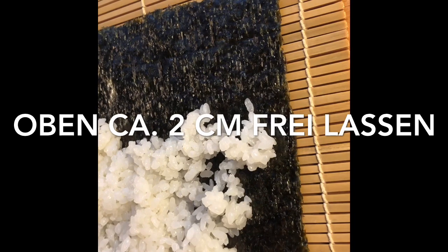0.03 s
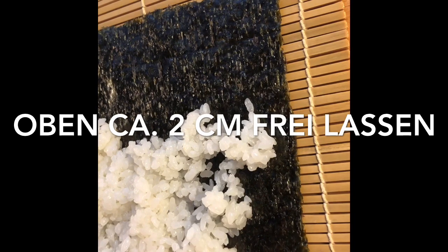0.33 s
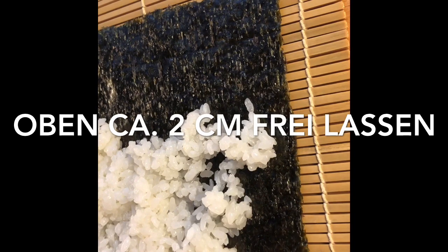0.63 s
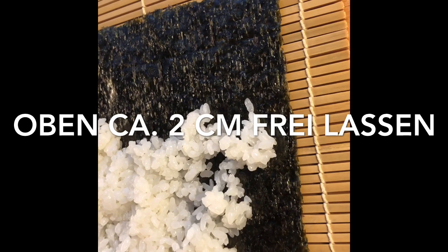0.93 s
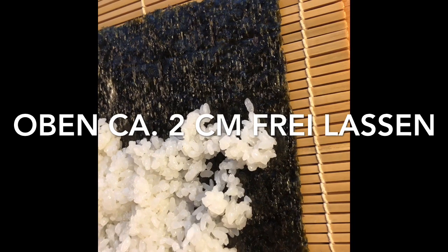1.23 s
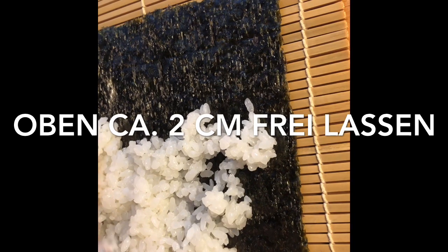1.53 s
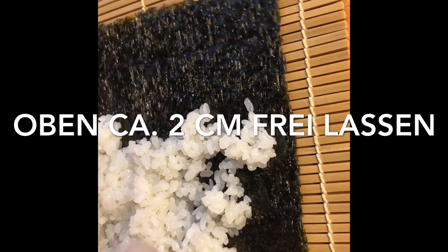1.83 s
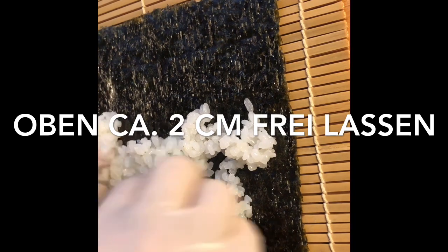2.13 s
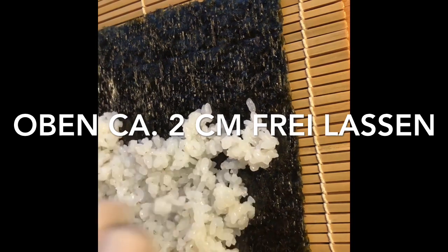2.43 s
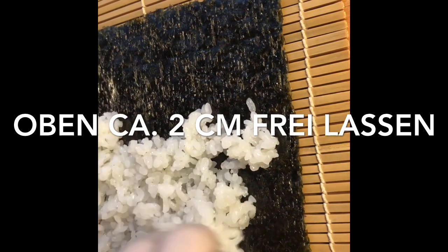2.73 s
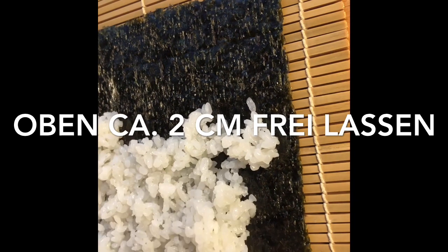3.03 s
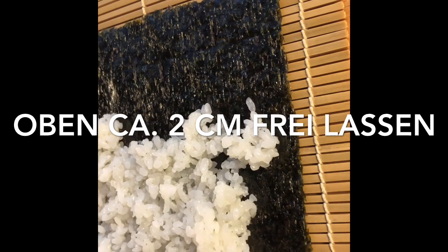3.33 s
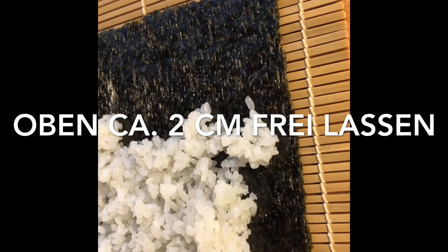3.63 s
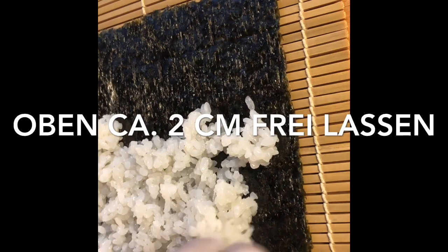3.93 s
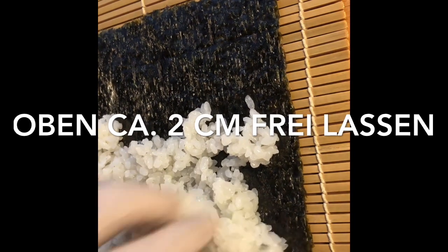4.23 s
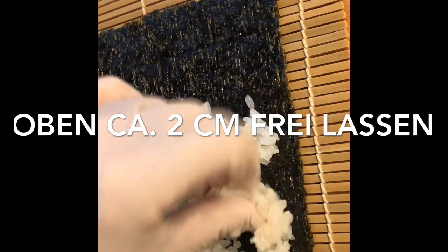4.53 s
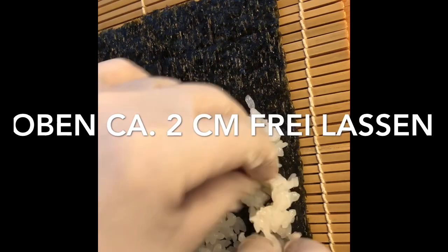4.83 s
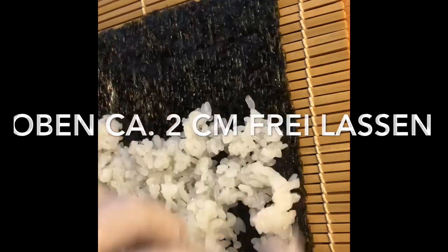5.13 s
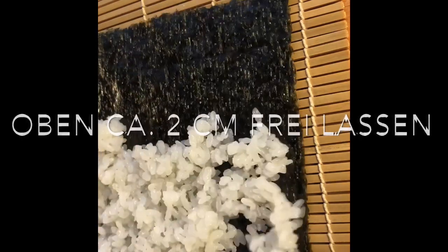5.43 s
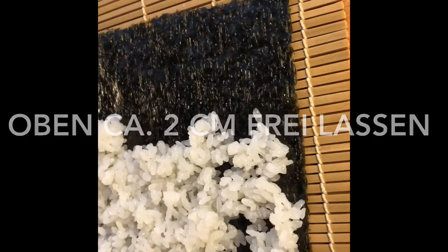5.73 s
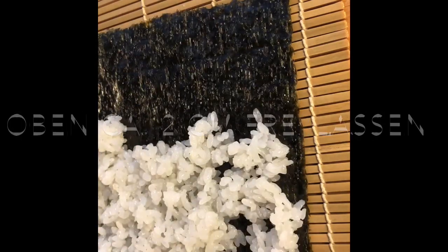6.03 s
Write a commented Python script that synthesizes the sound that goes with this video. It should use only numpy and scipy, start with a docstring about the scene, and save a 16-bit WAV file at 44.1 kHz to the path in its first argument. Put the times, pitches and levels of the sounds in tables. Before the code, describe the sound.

Close up in a quiet kitchen, brittle seaweed gives small, crisp, uneven snaps while fingers push sticky rice across it. The wet grains crackle faintly with each push, over soft rubbing and a few low worktop bumps. The snaps start sparse and light, grow louder and busier around the middle, and keep coming in little clusters to the end.

```python
"""A brittle seaweed sheet snaps as a hand presses and spreads sticky rice over it on a bamboo mat, close up.
Each snap is a thread letting go and a small patch ringing. Grains peel off in quick runs that make the
sheet flap, and wet rice crackles finely under the fingers. Skin brushes past twice, the palm rubs softly,
a few dull bumps come through the worktop, and a small quiet kitchen answers."""
import sys
import numpy as np
from scipy import signal
from scipy.fft import rfft, irfft, next_fast_len
from scipy.io import wavfile

SR = 44100
rng = np.random.default_rng(int(sys.argv[2]) if len(sys.argv) > 2 else 0)


def unload_audio(sound):
    """Save the sound as a 16-bit wav file, at the path given as the first command line argument."""
    columns = np.transpose(np.atleast_2d(sound))
    # keep every value between -1 and 1, then stretch to whole-number steps
    steps = np.round(np.clip(columns, -1, 1) * 32767)
    wavfile.write(sys.argv[1], SR, steps.astype(np.int16))


N = 272097
TIME = np.arange(N) / SR

# Clear snaps of the sheet and of parting grains. Each row: time in seconds, energy in dB (as a 1 ms burst),
# ring in Hz, width in octaves.
SNAPS = [(0.112, -40, 4560, 0.67), (0.1914, -45.5, 4480, 1), (0.2372, -45, 6800, 0.45),
         (0.4221, -46.5, 7860, 2.3), (0.4774, -46, 6260, 2.2), (0.549, -45, 2400, 2.8),
         (0.695, -42, 4840, 0.9), (0.7827, -30.5, 3630, 0.57), (0.834, -44, 4750, 1),
         (0.8673, -30, 8200, 0.88), (0.8773, -43.5, 8200, 0.8), (1.181, -37, 8400, 1.4),
         (1.2102, -28, 6100, 1.2), (1.6028, -35.5, 5300, 0.97), (1.6113, -33, 5100, 0.7),
         (1.658, -33.5, 7260, 2.6), (1.755, -39, 3570, 0.91), (1.7785, -46, 5400, 0.83),
         (1.8468, -30, 4200, 0.6), (1.8705, -28, 4860, 1.1), (2.0005, -38, 5400, 0.86),
         (2.044, -28.5, 8700, 2.4), (2.1125, -45, 8600, 1), (2.141, -38, 7060, 1.6),
         (2.182, -25, 5000, 0.8), (2.191, -29, 4400, 2.2), (2.2373, -38, 4700, 0.62),
         (2.26, -36, 4200, 0.73), (2.2903, -33, 3900, 1.3), (2.317, -36, 5200, 1.3),
         (2.3276, -27, 3300, 3.6), (2.3649, -38.5, 8200, 0.77), (2.5324, -33, 4280, 1.9),
         (2.624, -36.5, 9100, 1.3), (2.6381, -38, 6100, 1.9), (2.7427, -23.5, 7240, 5.5),
         (2.743, -27.5, 10300, 0.2), (2.8211, -22.5, 4480, 2.2), (2.958, -36, 4600, 1.6),
         (3.1266, -39, 5500, 0.98), (3.1782, -36, 7400, 1.9), (3.2195, -31, 3750, 1.5),
         (3.244, -17, 3150, 0.98), (3.2535, -36, 2950, 0.3), (3.344, -36, 7900, 1.7),
         (3.3734, -18, 5500, 0.6), (3.3738, -21.5, 10500, 2.2), (3.3737, -32, 1210, 0.34),
         (3.3804, -33.5, 8200, 1.3), (3.418, -20, 3180, 2.4), (3.4424, -27, 4800, 1.4),
         (3.4457, -19, 4770, 0.44), (3.4456, -17, 2800, 0.25), (3.4464, -13, 3800, 0.18),
         (3.4479, -11.5, 4850, 0.12), (3.4494, -23, 3200, 1.3), (3.4903, -27.5, 5600, 0.57),
         (3.5775, -28.5, 4560, 1), (3.604, -27.5, 1244, 0.23), (3.6047, -24, 3860, 2.8),
         (3.6511, -36.5, 7400, 2.6), (3.724, -24.5, 4540, 0.62), (3.8735, -32, 5300, 1.2),
         (3.8943, -18, 7100, 1.6), (4.0118, -36.5, 7100, 2.1), (4.0361, -43, 7300, 2.6),
         (4.0564, -32, 5000, 1.4), (4.106, -27, 4840, 3.4), (4.1851, -35, 6300, 2), (4.196, -38, 5200, 3.9),
         (4.3225, -33.5, 5470, 0.64), (4.3392, -34.5, 9260, 0.7), (4.3963, -33.5, 5370, 2.1),
         (4.4356, -33, 5000, 1.4), (4.4471, -28.5, 6000, 1.8), (4.448, -18, 4440, 0.71),
         (4.5065, -32, 2420, 3.4), (4.5153, -41, 7400, 2.2), (4.5849, -39.5, 6200, 3.2),
         (4.6573, -43, 7400, 1.5), (4.673, -42, 5600, 0.92), (4.7388, -38, 9600, 0.61),
         (4.789, -35, 12500, 1.4), (4.7893, -29, 2880, 0.71), (4.8108, -35.5, 9400, 1.9),
         (4.8277, -33.5, 3460, 1.4), (4.8629, -38, 6500, 3.2), (4.8924, -33, 2420, 1),
         (4.917, -24.5, 1420, 1.04), (4.9245, -28.5, 1810, 2.8), (4.929, -31, 7000, 2.8),
         (4.984, -31.5, 2430, 1), (5.051, -25, 4800, 4), (5.054, -28, 4300, 1.7), (5.0639, -14, 5830, 0.88),
         (5.065, -10, 9000, 2.5), (5.2055, -39.5, 1820, 0.37), (5.394, -24, 3860, 5.6),
         (5.491, -21.5, 4900, 0.66), (5.5615, -28, 3620, 0.65), (5.5712, -37.5, 6200, 2.9),
         (5.5804, -37, 4800, 0.9), (5.592, -20.5, 3800, 0.77), (5.593, -30, 11500, 1),
         (5.6682, -23.5, 4540, 1.9), (5.6741, -22, 4580, 0.35), (5.7364, -39, 4800, 2.9),
         (5.8611, -37.5, 5500, 1.5), (5.8829, -26, 4740, 0.64), (5.9111, -31, 4800, 0.78),
         (5.9344, -28, 9350, 2.1), (5.9395, -19, 6430, 1.5), (5.9694, -32.5, 7800, 2.4),
         (6.0667, -32, 9900, 0.89), (6.1363, -41.5, 12200, 0.8)]
# Runs of tiny snaps as sticky rice lets go. Each row: centre and spread in seconds, energy in dB,
# ring in Hz, flap against the run in dB, thud in Hz.
PEELS = [(0.827, 0.0044, -30, 4570, -5, 190), (1.178, 0.0089, -28.5, 7460, -10, 170),
         (1.4386, 0.0038, -26, 7300, -10.5, 140), (1.569, 0.0033, -32.5, 6400, -26, 190),
         (1.658, 0.0061, -37, 7800, -20, 190), (1.857, 0.009, -30.5, 4600, -8, 180),
         (2.287, 0.004, -31.5, 4220, 0, 160), (2.329, 0.0048, -33.5, 6400, -3, 75),
         (2.818, 0.0035, -30, 4630, -13, 170), (2.877, 0.0018, -29.5, 7140, -14, 180),
         (2.946, 0.0067, -17.5, 4700, -12, 73.5), (3.4482, 0.0024, -14, 6830, -7, 134),
         (3.725, 0.0036, -21, 4450, -11, 141), (4.109, 0.0028, -17, 3870, -14.5, 63.6),
         (4.855, 0.012, -37, 8000, -16, 190), (5.057, 0.0015, -15.5, 6130, -5.5, 68.4),
         (5.392, 0.0097, -28, 6400, -3.5, 150), (5.672, 0.0047, -20, 4550, -11.5, 68.6),
         (5.885, 0.0048, -28, 4360, -10, 159)]
# The sheet's ring on the mat. Each row: pitch in Hz, width in Hz, relative level in dB.
SHEET_MODES = [(1120, 290, 10), (1920, 47, -2), (2674, 210, -0.5), (3620, 290, 1)]
# Finger pushes into the rice. Each row: start and length in seconds, relative crackle level in dB,
# offset in dB at full fineness.
PRESSES = [(0.0, 0.053, -61.5, -12), (0.684, 0.28, -60, -2), (1.008, 0.48, -63, -6), (1.608, 0.2, -54, -9),
           (1.93, 0.21, -55.5, -2.5), (2.159, 0.087, -47.5, -8.5), (2.45, 0.21, -57, -1.5),
           (2.733, 0.12, -52.5, -5.5), (3.133, 0.36, -52.5, -3.5), (3.45, 0.13, -49, -19),
           (3.692, 0.039, -53.5, -8), (3.942, 0.17, -52.5, -4), (4.307, 0.21, -59, -5),
           (4.64, 0.42, -60, 0.5), (5.507, 0.13, -54, -4), (5.856, 0.16, -53.5, -6), (6.125, .1, -57.5, -3)]
# Fingers brushing the sheet. Each row: centre and spread in seconds, level in dB.
BRUSHES = [(3.1, 0.015, -39.5), (5.299, 0.023, -31.5)]
# Fader curve of the rubbing palm. Each row: time in seconds, relative level in dB.
RUB_LEVELS = [(0.0, -58.5), (0.38, -62.5), (1.72, -57.5), (1.82, -52), (2.23, -59), (3.28, -55.5),
              (3.61, -55.5), (3.81, -54.5), (5.76, -53.5), (6.17, -57.5)]
# Dull worktop bumps. Each row: start, rise and fade in seconds, relative level in dB, rumble centre in Hz.
BUMPS = [(0.01, 0.041, 0.16, -53.5, 226.4), (.13, 0.063, 0.077, -46, 164.4), (.86, 0.037, 0.11, -52.5, 282),
         (1.355, 0.025, 0.078, -45, 121.3), (2.537, 0.007, 0.013, -36.5, 215),
         (2.561, 0.013, 0.026, -34.5, 150), (2.6, 0.0083, 0.076, -40, 163), (2.66, 0.019, 0.16, -47.5, 57),
         (3.455, 0.019, 0.12, -46.5, 138.7)]
# Low resonances of worktop and kitchen. Each row: pitch in Hz, width in Hz, gain in dB.
BOOM_MODES = [(52, 4.2, 3.5), (138.5, 31, -2.5), (231, 29, -5.5), (304, 23, -5.5), (437, 33, -9)]
# EQ curves for rice, skin, palm, room tone and reverb tail. Each row: frequency in Hz, gain in dB.
CRACKLE_EQ = [(800, 4.5), (1700, -9.5), (2700, -6), (4500, 0.5), (7000, -0.5), (10000, 2), (16000, -2)]
BRUSH_EQ = [(290, -47), (500, -22), (1030, -6), (1130, -8), (1690, -11), (1790, -10), (3920, 0),
            (5240, -3.5), (6060, -1.5), (16000, -13)]
RUB_EQ = [(150, -29), (400, 1.5), (1000, 1), (2000, -0.5), (4000, -9), (12000, -12)]
KITCHEN_EQ = [(20, -22), (36, -7), (52, -4.5), (80, 1.5), (130, -3.5), (240, -3), (420, -5.5), (700, -12.5),
              (2000, -22), (6000, -26), (16000, -29)]
TAIL_EQ = [(60, 4.5), (150, 9.5), (400, 6), (2000, 1), (2850, 2.5), (4000, -0.5), (7000, -0.5), (11000, -4),
           (16000, -8)]


def snap(hz, octaves, lead_in_s=0.00035, rattle_s=0.0024, crack_db=-31):
    """A thread lets go; a small patch rings for a few cycles and nearby flakes rattle."""
    t = TIME[:800] - TIME[100]
    lead_in = 0.072 * np.exp(-np.abs(t) / lead_in_s)  # a very short swell of noise softens the attack
    rattle = 0.074 * np.exp(-np.abs(t) / rattle_s)
    push = rng.standard_normal(len(t)) * np.where(t < 0, lead_in, rattle)
    push[100] += 1  # the break itself
    width_hz = 2 * hz * np.sinh(octaves * np.log(2) / 2)
    # three resonances in series: the note takes a cycle or two to swell and has steep flanks
    note = ring(ring(ring(push, hz, 0.69 * width_hz), hz, 5.1 * width_hz), hz, 7.0 * width_hz)
    # the patch is too small to radiate much below its own note
    note = highpass(note, 0.31 * hz / 2 ** (octaves / 2))
    crack = highpass(ring(push, hz, 3.8 * hz), 0.71 * hz)
    return energy(note, 0) + energy(crack, crack_db)


def clear_snaps():
    """The foreground ticks of brittle sheet and parting grains, each breaking on its cue."""
    out = np.zeros(N)
    for s, db, hz, octaves in SNAPS:
        add(out, s - TIME[100], energy(snap(hz, octaves), db))
    return out


def faint_snaps(count=160, centre_hz=7000, over_db=4, scatter_db=3):
    """Lesser grains let go at random, as strongly as the fingers push."""
    out, push = np.zeros(N), finger_pressure()
    for slot, (when, size, pitch) in enumerate(rng.random((count, 3))):
        i = int((slot + when) / count * (N - 1))
        tick = snap(centre_hz * 2 ** (0.99 * (2 * pitch - 1)), octaves=0.79)
        add(out, TIME[i], push[i] * energy(tick, over_db + scatter_db * (2 * size - 1)))
    return out


def peels(thud_db=-16):
    """Sticky threads break in a run that swells and dies, and the freed sheet flaps back onto the mat."""
    out, t = np.zeros(N), TIME[:6000] - TIME[3000]
    for s, spread, db, hz, flap_db, thud_hz in PEELS:
        run = grains(len(t), rate=6000, scatter_db=2.5) * np.exp(-np.abs(t) / spread)
        run = highpass(ring(run, hz, 0.85 * hz), 0.1 * hz)
        # the run shakes the whole sheet, most of all the modes near its own pitch
        sheet = sum(energy(ring(run, mode_hz, width), mode_db - 7 * abs(np.log2(mode_hz / hz)))
                    for mode_hz, width, mode_db in SHEET_MODES)
        add(out, s + t[0], energy(energy(run, 7) + sheet, db))
        add(out, s + spread / 2, energy(sheet_flap(), db + flap_db))
        add(out, s, energy(mat_thud(thud_hz), db + thud_db))
    return out


def sheet_flap(drop_hz=1100, floor_hz=45, fall_s=0.00301, fade_s=0.0062, roughness=1.48):
    """Bending waves cross the limp sheet: the high ones arrive first, so the plop falls in pitch."""
    t = TIME[:6000]
    hz = floor_hz + drop_hz / (1 + t / fall_s)
    sweep = np.sin(2 * np.pi * np.cumsum(hz) / SR)
    crumple = eq(rng.standard_normal(len(t)), [(40, 0), (150, -1), (400, -1.5), (900, -4.5), (2500, -16.5)])
    return (sweep + roughness * level(crumple, 0)) * np.exp(-t / fade_s)


def mat_thud(hz, rise_s=0.0086, fade_s=0.013):
    """The mat settles with a late, low thud."""
    t = TIME[:9000]
    push = rng.standard_normal(len(t)) * (1 - np.exp(-t / rise_s)) * np.exp(-t / fade_s)
    return highpass(ring(push, hz, 0.5 * hz), hz)


def rice_crackle(cluster_db=2.5, patchy_db=2.5):
    """Wet grains of many sizes part under the fingers, in loose clusters; each size has its own pitch."""
    out, cluster = 0, cluster_db * drift(32)
    coarse, fine = finger_pressure(), finger_pressure(fineness=0.68)
    for hz in np.geomspace(1700, 14000, 9):
        clicks = grains(N, rate=150, scatter_db=2.5) * undb(cluster + patchy_db * drift(35))
        band = ring(ring(clicks, hz, 0.34 * hz), hz, 2 * hz)
        blend = np.interp(hz, [4500, 9000], [0, 1])
        push = coarse * (fine / coarse) ** blend
        out = out + push * level(band, -5)
    return eq(out, CRACKLE_EQ)


def finger_pressure(fineness=0, attack_s=0.012, release_s=0.069, rest_db=-66, rest_fine_db=-10):
    """Envelope for coarse (0) to fine (1) grains: each push builds, holds and relaxes."""
    power = undb(rest_db + fineness * rest_fine_db) ** 2  # rice settling between pushes
    for s, length, db, fine_db in PRESSES:
        attack = np.clip((TIME - s) / attack_s + .5, 0, 1)
        release = np.exp(-np.maximum(TIME - s - length, 0) / release_s)
        power = power + (attack * release * undb(db + fineness * fine_db)) ** 2
    return np.sqrt(power)


def skin_brushes():
    """Skin slides over the dry sheet: slips so dense that they hiss."""
    strokes = sum(undb(db) * np.exp(-.5 * ((TIME - s) / spread) ** 2) for s, spread, db in BRUSHES)
    slips = eq(grains(N, rate=30000, scatter_db=4), BRUSH_EQ)
    return strokes * level(slips, 0)


def palm_rub(waver_db=2.7):
    """The palm drags softly on rice and mat in many tiny slips."""
    slips = eq(grains(N, rate=2500, scatter_db=3), RUB_EQ)
    fader_db = np.interp(TIME, *np.transpose(RUB_LEVELS)) + waver_db * drift(25)
    return level(slips, -0.5) * undb(fader_db)


def worktop_bumps(slide=0.7, slide_s=0.012):
    """Soft, heavy pushes rumble in the worktop; their note sinks as the weight comes on."""
    out, t = np.zeros(N), TIME[:SR]
    for s, rise, fade, db, hz in BUMPS:
        push = np.minimum(t / rise, 1) * np.exp(-np.maximum(t - rise, 0) / fade)
        wobble = 1 + 0.0786 * drift(60)[:SR]
        pitch = .85 * hz * (1 + slide * np.exp(-t / slide_s)) * wobble
        note = np.sin(2 * np.pi * np.cumsum(pitch) / SR)
        rumble = ring(ring(rng.standard_normal(SR), hz, hz), hz, 2 * hz)
        rumble = highpass(rumble, 0.74 * hz)
        add(out, s, push * undb(db) * (level(note, -6) + level(rumble, -2)))
    return eq(out, [(30, 11), (60, 2), (330, 0.5), (600, -9.5), (2000, -2)])


def kitchen_reverb(x, decay_s=0.28, tail_db=-12, wall_db=-22, wall_s=0.0085):
    """A short small-room tail, with a faint early wall bounce inside it."""
    t = TIME[:SR // 2]
    fade_in = np.clip((t - .002) / 0.0078, 0, 1)
    tail = eq(rng.standard_normal(len(t)), TAIL_EQ) * undb(-60 * t / decay_s) * fade_in
    bounce = rng.standard_normal(len(t)) * (t > wall_s) * np.exp(-t / 0.0061)
    response = sum(undb(db) * part / np.sqrt(np.sum(part ** 2))
                   for part, db in [(boom(tail), tail_db), (bounce, wall_db)])
    return signal.fftconvolve(x, response)[:N]


def kitchen_tone(db=-53.5, waver_db=0.23):
    """A steady bed of low room noise with faint hiss."""
    bed = boom(eq(rng.standard_normal(N), KITCHEN_EQ))
    return level(bed, db) * undb(waver_db * drift(3.9))


def boom(x):
    """The worktop and kitchen favour a few low notes."""
    return 0.76 * x + sum(undb(db) * ring(x, hz, width) for hz, width, db in BOOM_MODES)


def grains(count, rate, scatter_db):
    """Random tiny clicks, about `rate` a second: many weak ones, a few strong."""
    chance, size = rng.random((2, count))
    sign = rng.choice([-1, 1], count)
    return (chance < rate / SR) * sign * undb(-scatter_db * np.log(np.maximum(size, .004)))


def drift(rate):
    """Slow random modulation with a spread near 1 and `rate` new targets a second."""
    knots = rng.standard_normal(N // 100)
    return np.interp(TIME * rate, np.arange(len(knots)), knots)


def ring(x, hz, width_hz):
    """One damped resonance, gain 1 at its centre."""
    hz = min(hz, .4 * SR)
    return signal.lfilter(*signal.iirpeak(hz, hz / min(width_hz, SR / 4), fs=SR), x)


def highpass(x, hz):
    """Low cut: small radiators give off little bass."""
    return signal.lfilter(*signal.butter(2, hz, "high", fs=SR), x)


def eq(x, points):
    """Shape a sound with a curve through (Hz, dB) points."""
    hz, db = np.transpose(points)
    size = next_fast_len(len(x))
    bins_hz = np.maximum(np.fft.rfftfreq(size, 1 / SR), 1)
    gain = undb(np.interp(np.log(bins_hz), np.log(hz), db))
    return irfft(rfft(x, size) * gain, size)[:len(x)]


def undb(db):
    """Decibels to gain."""
    return 10 ** (np.asarray(db) / 20)


def level(x, db):
    """Scale to an rms level."""
    return x * undb(db) / np.sqrt(np.mean(x ** 2))


def energy(x, db):
    """Scale to the energy of one millisecond at this level."""
    return x * undb(db) * np.sqrt(SR / 1000 / np.sum(x ** 2))


def add(out, s, x):
    """Mix a short sound in at `s` seconds."""
    i = int(np.clip(s * SR, 0, N - 1))
    out[i:i + len(x)] += x[:N - i]


def scene():
    """Mono mix: snaps, peels, brushes and crackle up front; rubbing, bumps and the kitchen behind."""
    crunch = peels() + skin_brushes()
    ticks = clear_snaps() + faint_snaps()
    crackle = rice_crackle()
    # open snaps face the microphone; crackle under the palm reaches it more by way of the room
    room = kitchen_reverb(0.91 * crunch + 0.66 * ticks + 1.83 * crackle)
    direct = crunch + ticks + 1.15 * crackle
    return (direct + room + palm_rub() + worktop_bumps() + kitchen_tone())[None]


def record(dry):
    """The deepest bass is dropped, a soft limiter rounds the loudest peaks, a steep filter cuts the top."""
    low_cut = signal.butter(4, 42, "high", fs=SR, output="sos")
    high_cut = signal.ellip(10, .2, 80, 16000, fs=SR, output="sos")
    rounded = np.tanh(signal.sosfilt(low_cut, dry))
    return signal.sosfilt(high_cut, rounded)


dry = scene()
out = record(dry)
unload_audio(out)
```